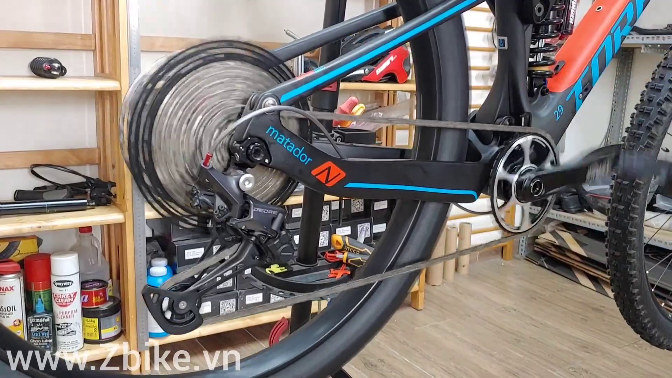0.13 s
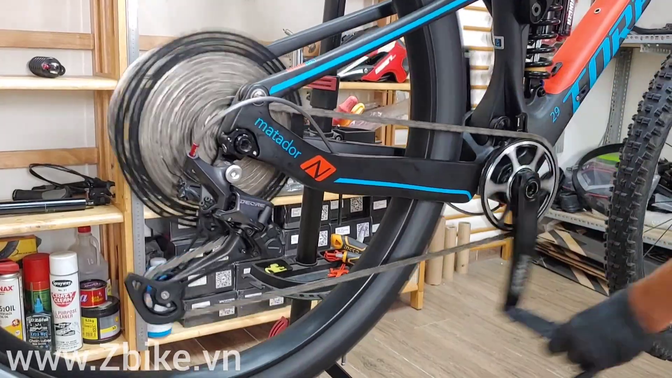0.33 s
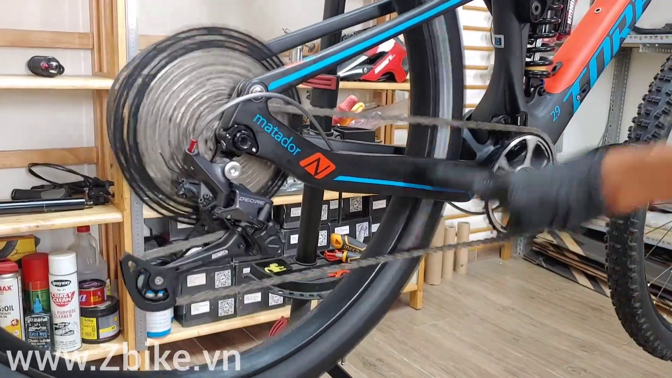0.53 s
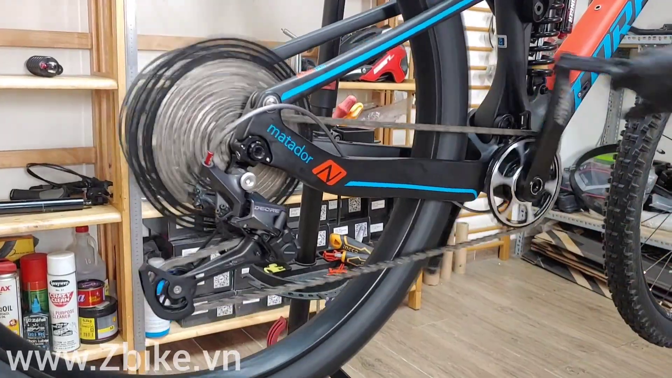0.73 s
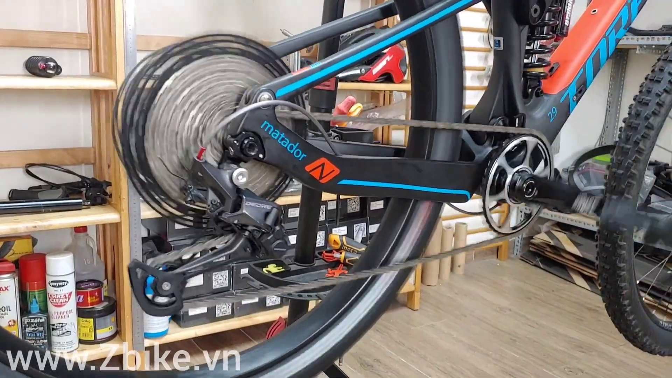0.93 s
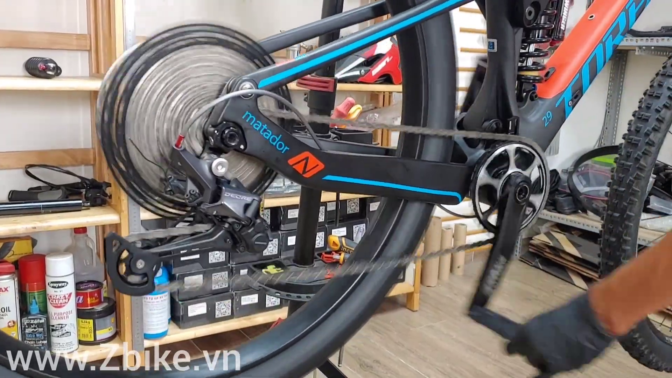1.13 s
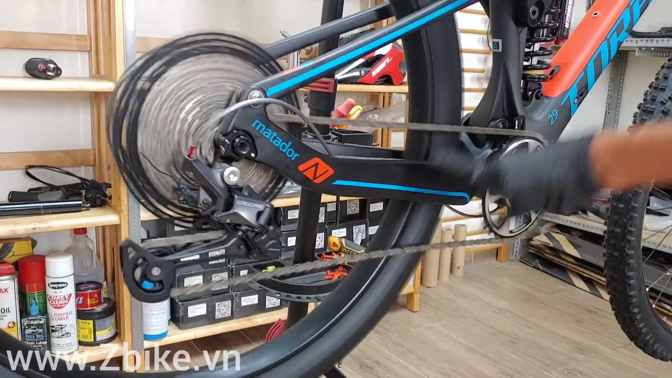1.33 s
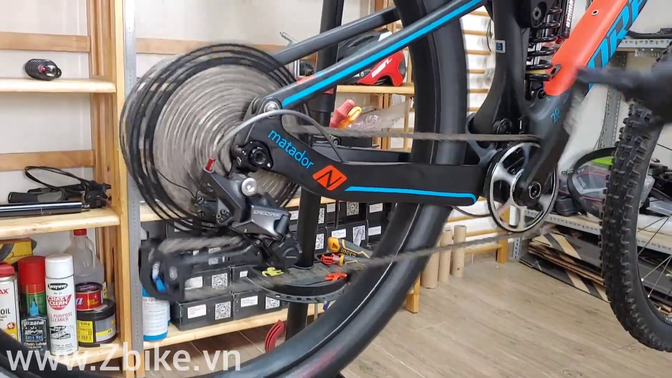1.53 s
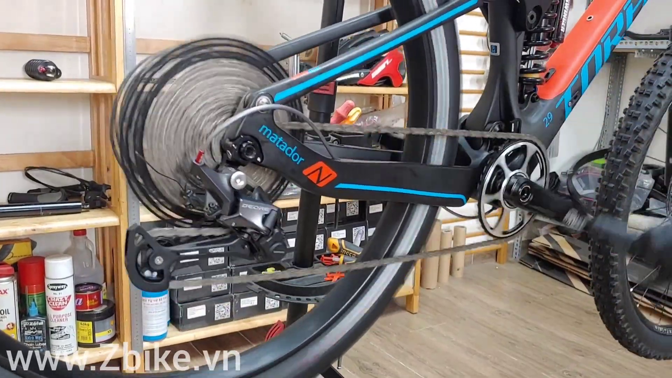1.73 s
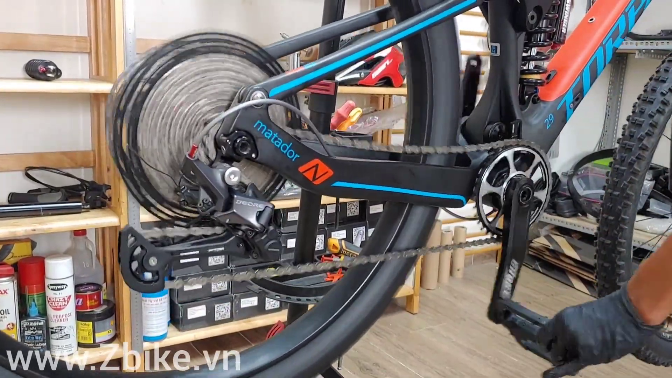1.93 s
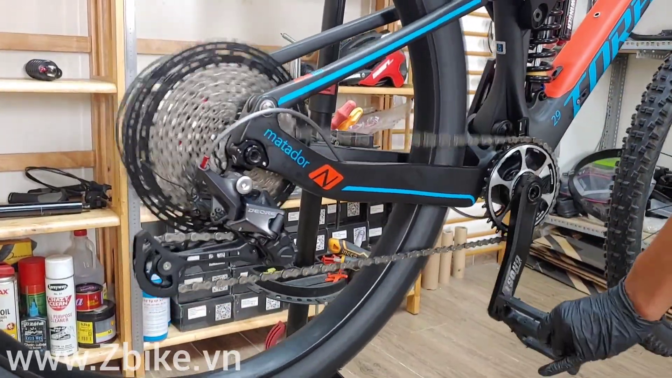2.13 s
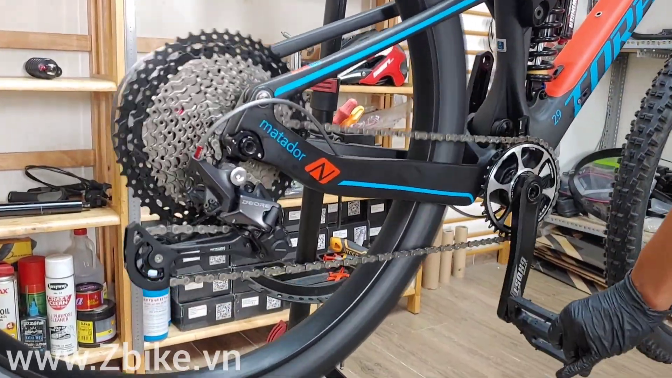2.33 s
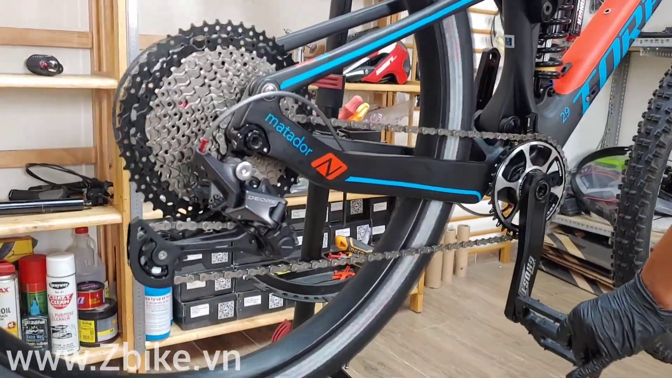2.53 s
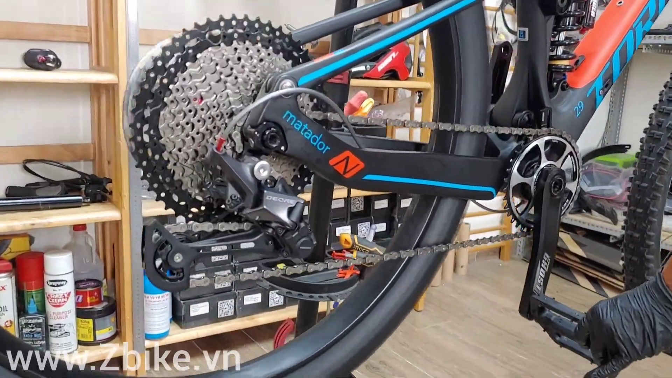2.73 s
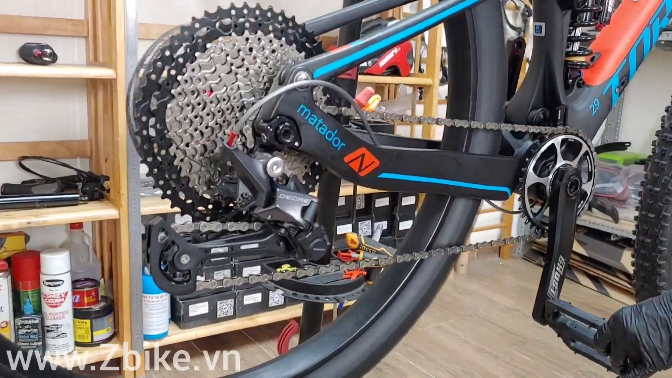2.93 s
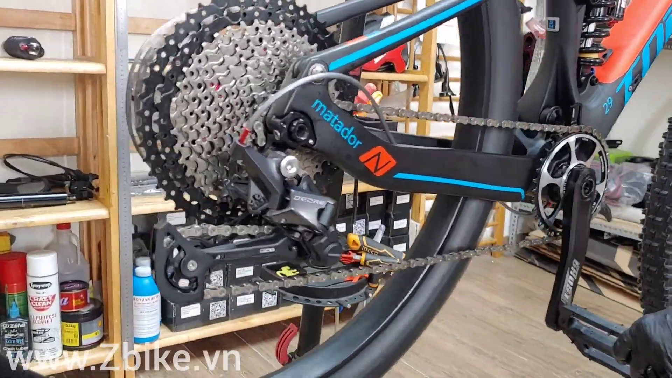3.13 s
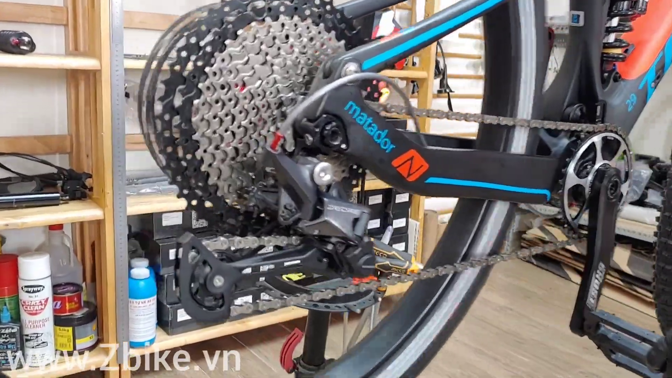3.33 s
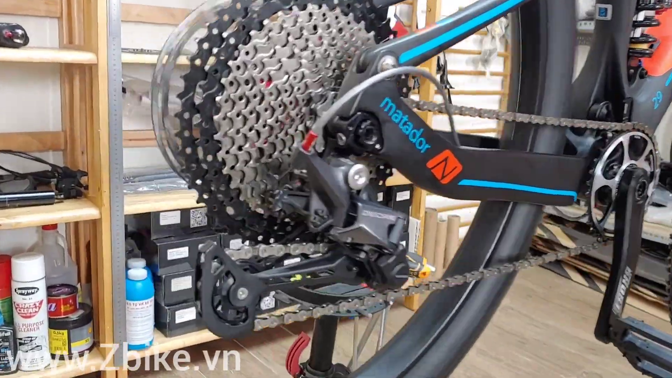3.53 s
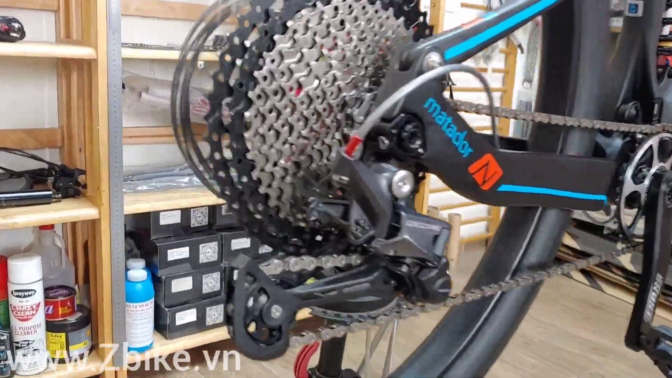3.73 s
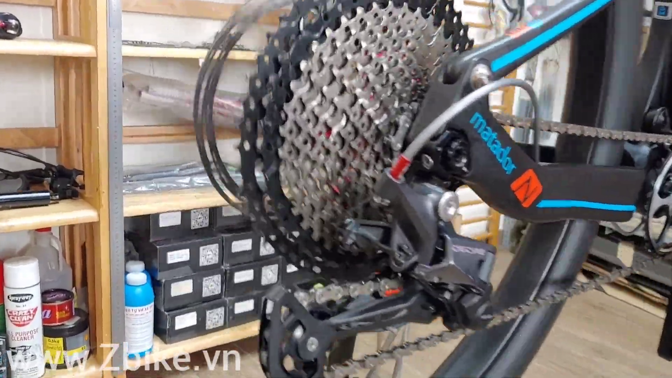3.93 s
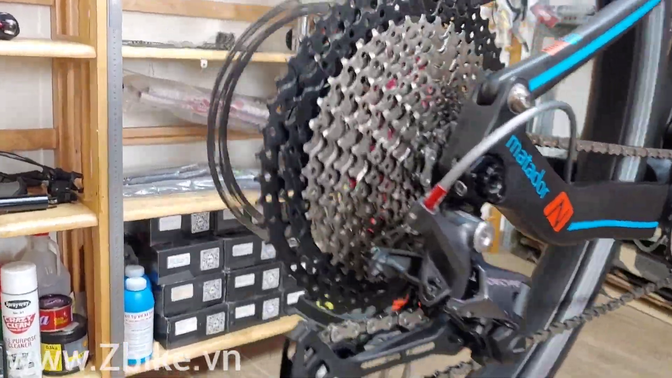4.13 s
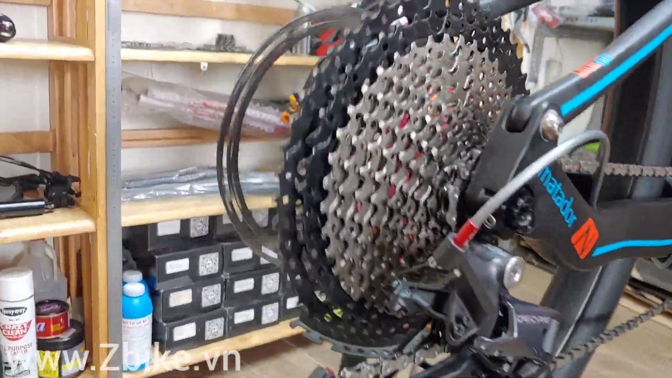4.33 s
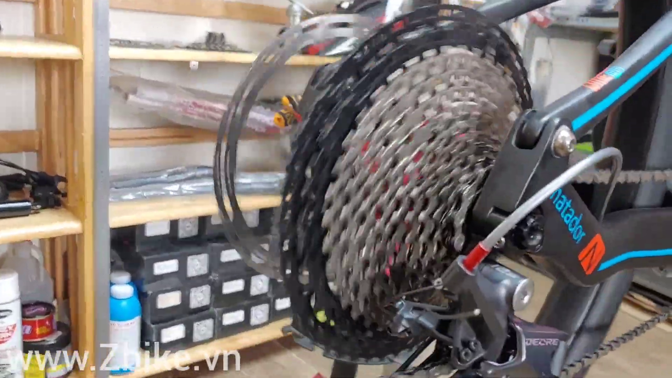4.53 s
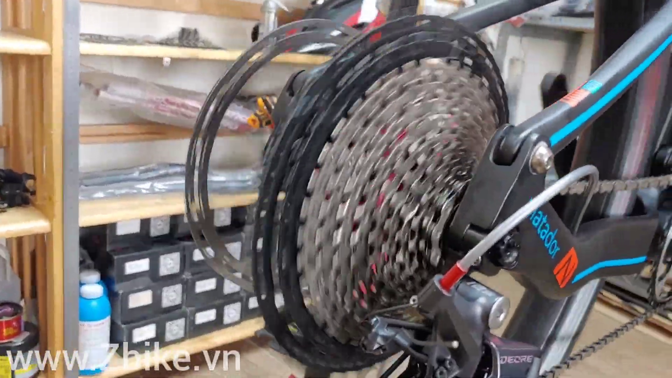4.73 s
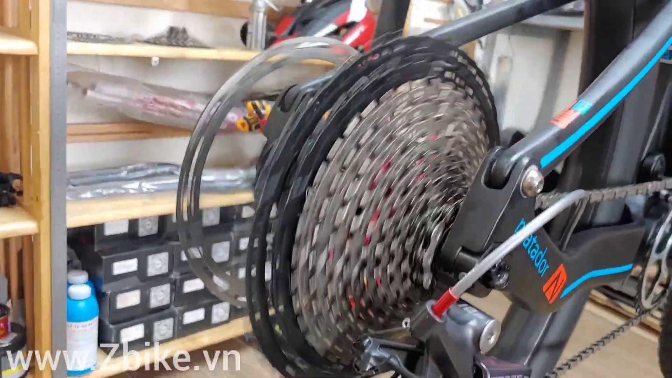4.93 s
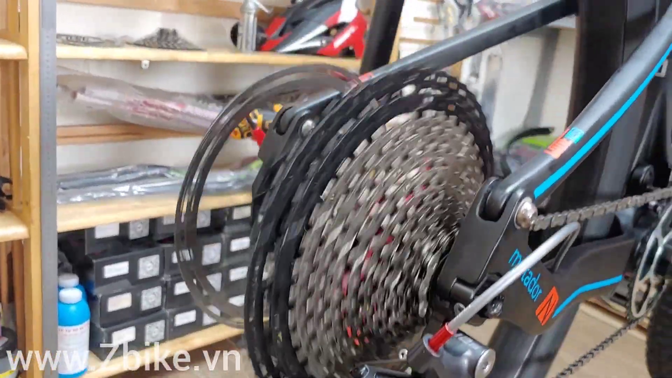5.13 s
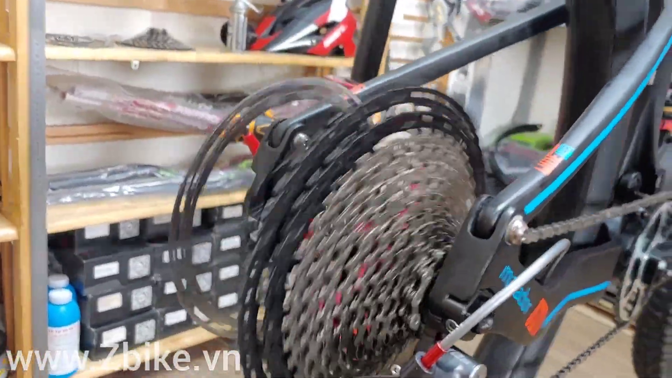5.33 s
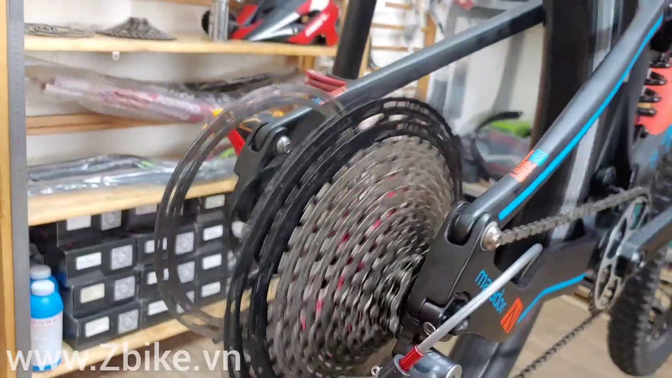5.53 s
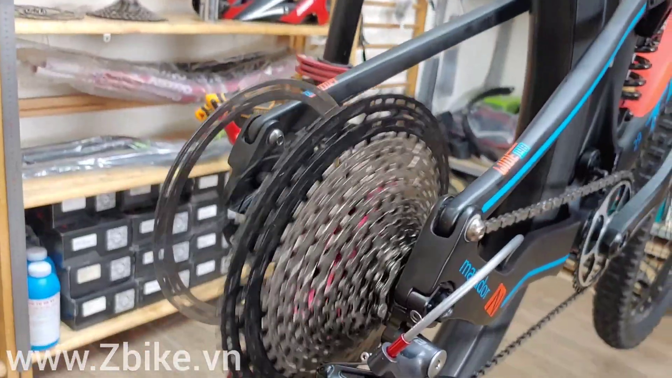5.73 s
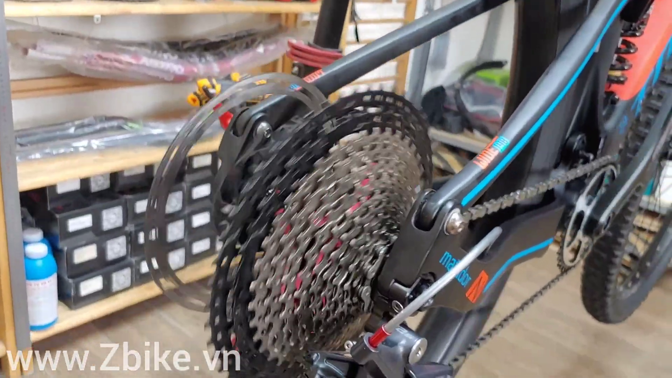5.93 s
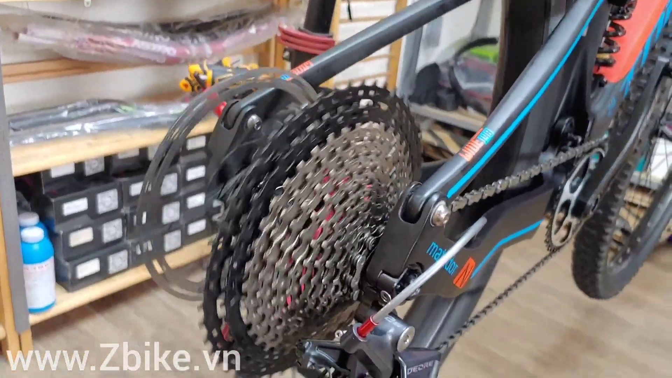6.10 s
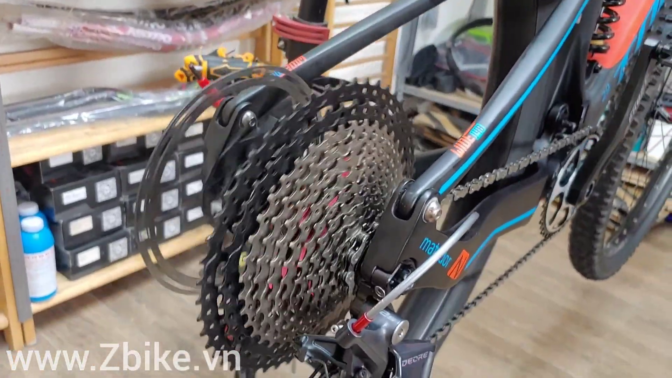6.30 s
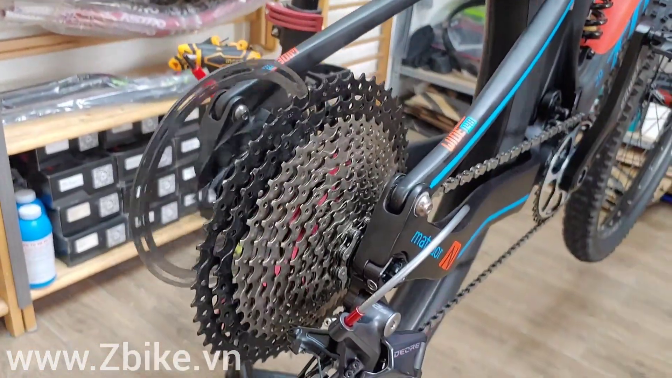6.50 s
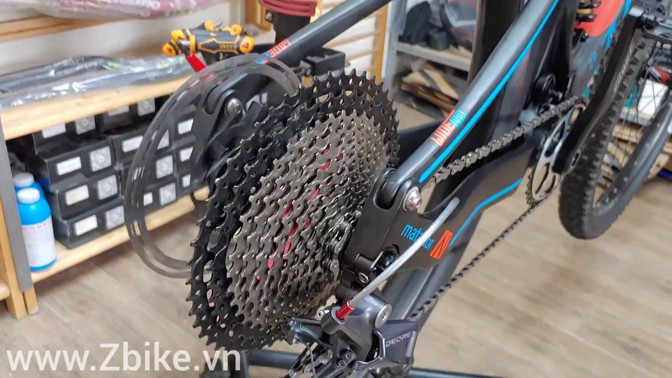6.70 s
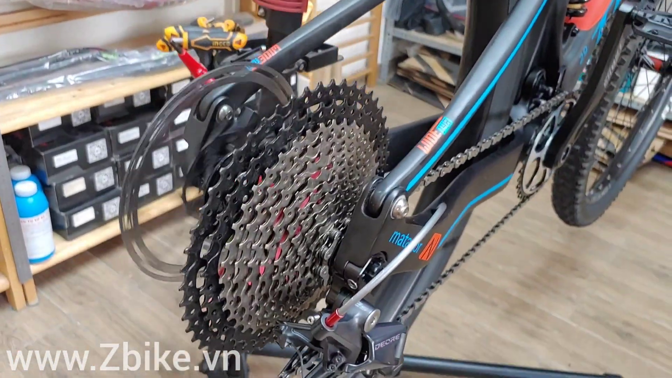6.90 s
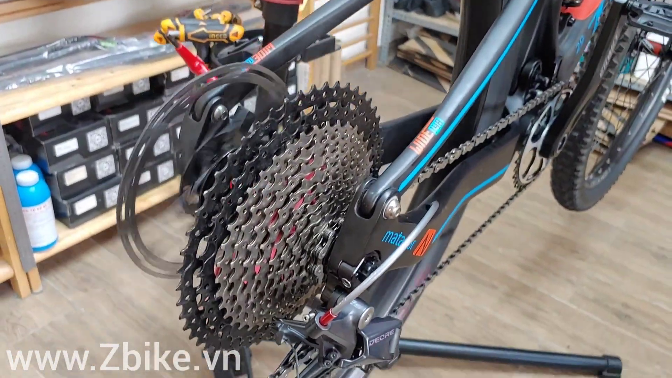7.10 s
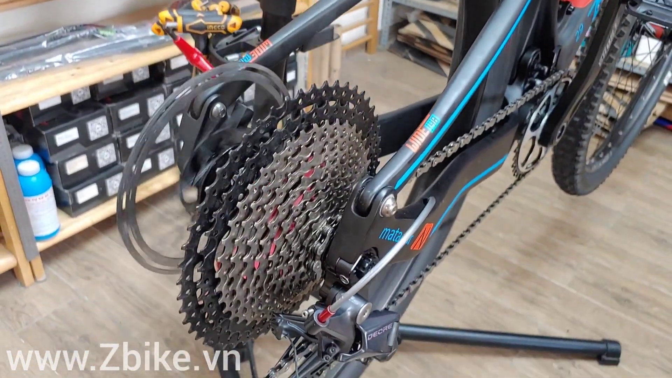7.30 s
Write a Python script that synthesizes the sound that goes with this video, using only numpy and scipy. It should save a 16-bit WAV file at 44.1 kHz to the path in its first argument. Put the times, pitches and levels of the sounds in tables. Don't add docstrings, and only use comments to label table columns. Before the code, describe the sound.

Two seconds of rattling chain shifts and metallic knocks, then a fast, piercing ratchet buzz rising in pitch and sinking again in a small shop.

```python
import sys
import numpy as np
from scipy import signal
from scipy.fft import rfft, irfft, next_fast_len
from scipy.io import wavfile
from scipy.ndimage import uniform_filter1d, minimum_filter1d

SR = 44100
rng = np.random.default_rng(int(sys.argv[2]) if len(sys.argv) > 2 else 0)


def file_out(sig):
    cols = np.atleast_2d(sig).T
    lim = np.clip(cols, -1, 1)
    pcm = np.round(lim * 32767).astype(np.int16)
    wavfile.write(sys.argv[1], SR, pcm)


def makeup_ratio(level_db):
    decades = np.asarray(level_db, float) / 20
    return 10 ** decades


N = 328978
T_S = np.arange(N) / SR
SIZE = next_fast_len(N + SR)
HZ = np.maximum(np.arange(SIZE // 2 + 1) * SR / SIZE, 1)
RELEASE_S, SETTLED_S = 1.959, 4.86

# (frequency [Hz], width [Hz], gain [dB])
SNAP_PEAKS = [(7620, 260, 6), (8290, 130, 7), (8760, 120, 3), (9160, 50, 4), (9750, 150, 3),
              (12200, 150, 5), (13750, 110, 6)]


def rms_one(x):
    return x / np.sqrt(np.mean(x ** 2) + 1e-20)


def in_time(rows):
    s, *columns = np.transpose(rows)
    return [np.interp(T_S, s, c) for c in columns]


def at_hz(points, hz):
    table_hz, value = np.array(points).T
    return np.interp(np.log(hz), np.log(table_hz), value)


def colour(x, spectrum, peaks=()):
    db = at_hz(spectrum, HZ)
    for hz, width_hz, gain_db in peaks:
        db = db + gain_db / (1 + (2 * (HZ - hz) / width_hz) ** 2)
    cepstrum = irfft(np.log(rms_one(makeup_ratio(db))), SIZE)
    cepstrum[1:SIZE // 2] *= 2
    cepstrum[SIZE // 2 + 1:] = 0
    return irfft(rfft(x, SIZE) * np.exp(rfft(cepstrum)), SIZE)[..., :N]


def butter(x, order, hz, kind="low"):
    return signal.sosfilt(signal.butter(order, hz, kind, fs=SR, output="sos"), x)


def drift(rate_hz):
    r = np.exp(-2 * np.pi * rate_hz / SR)
    return rms_one(signal.lfilter([1], [1, -2 * r, r * r], rng.standard_normal(N + SR))[SR:])


def fade(x, t60_s):
    return signal.lfilter([1], [1, -makeup_ratio(-60 / (t60_s * SR))], x + 1e-18)


def grains(per_s, spread_db):
    sizes = makeup_ratio(spread_db * np.minimum(rng.exponential(1, N), 5)) * rng.choice([-1, 1], N)
    return rms_one(sizes * (rng.random(N) < per_s / SR))


def pair(shape):
    # (frequency [Hz], likeness [0..1])
    likeness = [(60, 0.63), (300, 0.86), (700, 0.48), (1500, 0.1), (16000, 0.073)]
    mid, side = rfft(shape, SIZE)
    alike = np.clip(at_hz(likeness, HZ), 0, 1)
    return np.sqrt(1 + alike) * mid + np.sqrt(1 - alike) * side * [[1], [-1]]


def room(x, gap_s=0.0018):
    # (frequency [Hz], t60 [s])
    room_t60 = [(100, .7), (1000, 0.37), (4000, 0.41), (9000, 0.19), (16000, 0.18)]
    t, tail = np.arange(SR) / SR, 0
    white = rng.standard_normal((2, SR)) * (t > gap_s)
    edges_hz = [20, 200, 500, 1200, 3000, 6000, 11000, 21000]
    for low, high in zip(edges_hz, edges_hz[1:]):
        t60_s = at_hz(room_t60, np.sqrt(low * high))
        band = butter(white, 2, [low, high], "band")
        tail = tail + band * makeup_ratio(-60 * t / t60_s) * np.sqrt(np.log(1000) / (t60_s * SR))
    return irfft(rfft(x, SIZE) * pair(tail), SIZE)[:, :N]


def swing():
    return np.clip((T_S - 5.9) / 0.14, 0, 1)


def shop():
    # (frequency [Hz], density [dB per Hz])
    air_spectrum = [(18, -42), (30, -20.5), (55, -14), (100, -4), (170, -15), (400, -13.5), (900, -17.5),
                    (2000, -22), (5000, -17.5), (8000, -13), (16000, -26)]
    hum_hz, hum_db, air_db = 74.4, -44, -41.5
    duck_db, duck_s, sink_db_per_s, swing_db = -7.5, 0.1005, -2.5, 4
    since = np.maximum(T_S - RELEASE_S, 0)
    gain_db = duck_db * (1 - np.exp(-since / duck_s)) + swing_db * swing()
    sunk_db = sink_db_per_s * np.minimum(since, SETTLED_S - RELEASE_S)
    hum = np.sqrt(2) * np.sin(2 * np.pi * np.cumsum(hum_hz * (1 + 0.0026 * drift(3.3))) / SR)
    hum = makeup_ratio(hum_db + sunk_db + 2.0 * drift(3)) * hum * makeup_ratio([[2.2], [-2.2]])
    air = rms_one(colour(irfft(pair(rng.standard_normal((2, SIZE))), SIZE), air_spectrum))
    air = makeup_ratio(air_db + 0.53 * sunk_db + 0.5 * drift(0.34)) * air
    return makeup_ratio(gain_db) * (hum + air)


def frame(thud):
    # (frequency [Hz], level [dB], t60 [s])
    modes = [(135, -16, .4), (355, -3, .65), (385, -7, .5), (409, -2, .65), (455, -5, .75), (522, -4, .9),
             (590, -11, .5), (700, -3, .5), (818, -8, .55), (1114, -8, .28), (1733, -14, .4),
             (2450, -10, .27)]
    rings = np.zeros(N)
    for hz, level_db, t60_s in modes:
        r, w = makeup_ratio(-60 / (t60_s * SR)), 2 * np.pi * hz / SR
        mode = signal.lfilter([0, np.sin(w)], [1, -2 * r * np.cos(w), r * r], thud + 1e-18)
        rings += makeup_ratio(level_db - 45.5) * mode
    return rings


def spoke_ring():
    # (time [s], frequency [Hz], level [dB], t60 [s])
    ring = (1.64, 409, -31, 1.6)
    s, hz, level_db, t60_s = ring
    t = np.maximum(T_S - s, 0)
    waver_db, sway_rad = 3 * drift(8), .9 * drift(8)
    return makeup_ratio(level_db - 60 * t / t60_s + waver_db) * np.sin(2 * np.pi * hz * t + sway_rad) * (t > 0)


def chain(tick_t60_s=.014):
    # (time [s], peak [dB], gear body over peak [dB], rattle t60 [s])
    landings = [(0.0607, -7.5, -8.5, 0.2), (0.1704, -13.5, -4.5, 0.075), (0.182, -16.5, -8.5, 0.29),
                (0.4557, -9.5, -19, 0.26), (0.4768, -17.5, 2.5, 0.23), (0.5087, -29.5, 4, 0.27),
                (0.644, -9.5, -6.5, 0.21), (0.79, -17.5, -2.5, 0.2), (0.8704, -5.5, -21, 0.079),
                (0.8735, -5, -23, 0.1), (0.891, -17.5, -10, 0.2), (1.0894, -19, -9, 0.18),
                (1.1144, -10.5, -21, 0.11), (1.12, -7.5, -17, 0.18), (1.156, -11.5, -15.5, 0.39),
                (1.2562, -14.5, -5.5, 0.32), (1.4277, -21, -0.5, 0.14), (1.5288, -3.5, -16, 0.081),
                (1.5377, -17, -7, 0.093), (1.618, -14, -25, 0.074), (1.6337, -4.5, 3.5, 0.056),
                (1.6514, -6, -9, 0.14), (1.668, -8.5, 3, 0.055), (1.6982, -21, -0.5, 0.35),
                (1.7894, -27.5, -9, 0.46), (2.053, -24, 4, 0.052)]
    # (time [s], peak [dB])
    roller_ticks = [(0.049, -27), (0.2134, -10.5), (0.232, -9), (0.2667, -14), (0.2853, -19), (0.3465, -18),
                    (0.3875, -16.5), (0.4386, -10.5), (0.832, -4), (0.945, -9), (1.0216, -15.5),
                    (1.045, -26), (1.1894, -20), (1.3204, -30), (1.4497, -8), (1.487, -12.5), (1.506, -29),
                    (1.939, -18)]
    # (time [s], level [dB], t60 [s])
    bumps = [(0.4582, -17.5, 0.22), (0.4764, -6.5, 0.21), (0.5093, -10.5, 0.19), (0.61, -4, 0.073),
             (0.792, -25, 0.22), (0.873, -29, 0.4), (1.118, -30, 0.42), (1.537, -23, 0.27),
             (1.6173, -20.5, 0.24), (1.6329, 1, 0.097), (1.65, -34.5, 0.42), (1.698, -2.5, 0.22),
             (1.7879, -12.5, 0.21), (2.799, -39, .15), (2.958, -34, .015), (3.593, -33, .015),
             (4.27, -60, .04), (6.2, -45, .04)]
    # (time [s], pull [dB])
    pull = [
        (0, -2.5),
        (.4, -6),
        (.7, 4),
        (1.05, -0.5),
        (1.35, -0.5),
        (1.55, 5),
        (1.75, 6),
        (1.85, -17),
        (1.95, 2),
        (2.05, -34),
    ]
    # (frequency [Hz], density [dB per Hz])
    link_spectrum = [(2350, -32), (4000, -10.5), (5110, -11.5), (5980, -10), (6880, 0), (8010, 1),
                     (9210, -9), (14900, -28), (16100, -42)]
    # (frequency [Hz], density [dB per Hz])
    body_spectrum = [(470, -48), (800, -7), (925, -16.5), (1080, 3.5), (1310, 4), (1600, -1.5),
                     (1960, -0.5), (2690, 1.5), (5000, -13.5), (6500, -42), (11000, -120)]
    # (frequency [Hz], width [Hz], gain [dB])
    body_peaks = [(1330, 70, 7), (1750, 60, 5), (2050, 80, 4), (2560, 90, 5)]
    # (frequency [Hz], density [dB per Hz])
    thud_spectrum = [(53, -57), (90, -15.5), (306, -14), (353, -1), (415, -2), (462, -8), (706, -1.5),
                     (925, -7.5), (1200, -24), (1560, -84), (2640, -120)]
    links_db, gears_db, gears_follow = -25.5, -40, 2.5
    scatter_db, frame_share_db = 5.0, -32.5
    rise_share = 0.013

    pull_db, = in_time(pull)
    links = makeup_ratio(links_db + pull_db - 8.5) * np.array([grains(2500, 2.9), grains(2500, 7.2)])
    body = makeup_ratio(gears_db + gears_follow * pull_db - 12) * grains(2200, 3.7)
    thud = np.zeros(N)

    jingle, rattle = np.array([grains(9000, 0.57), grains(6700, 4.2)]), grains(5000, 0.97)
    shake, t = rng.standard_normal(N), np.arange(SR // 2) / SR
    for s, level_db, t60_s in bumps:
        span = slice(round(s * SR), round(s * SR) + SR // 2)
        thud[span] += makeup_ratio(level_db - 8 - 60 * t / t60_s) * shake[span]
    ticks = [(s, peak_db, -20, tick_t60_s) for s, peak_db in roller_ticks]
    pans_db = scatter_db * rng.standard_normal(60)
    for (s, peak_db, over_db, t60_s), pan_db in zip([*landings, *ticks], pans_db):
        at = round(s * SR)
        span = slice(at, at + SR // 2)
        sides = makeup_ratio([pan_db / 2, -pan_db / 2])
        burst = makeup_ratio(peak_db - 6.5 - 60 * t / t60_s) * np.minimum(t / (t60_s * rise_share), 1)
        links[:, span] += burst * jingle[:, span] * sides[:, None]
        links[:, at] += makeup_ratio(peak_db + 5) * sides
        body[span] += burst * rattle[span] * makeup_ratio(over_db)
        thud[span] += burst * shake[span] * makeup_ratio(frame_share_db)

    links = colour(links, link_spectrum, SNAP_PEAKS[:3])
    low = colour(body, body_spectrum, body_peaks) + makeup_ratio(-7.5) * colour(thud, thud_spectrum)
    low = low + frame(thud) + spoke_ring()
    links = links + room(links[0])
    gain_db, = in_time([(0, -1.55), (1.96, -0.82), (2.1, 0.023)])
    return makeup_ratio(gain_db) * (links + low * makeup_ratio([[2.5], [-2.5]]) + makeup_ratio(8.5) * room(low))


def skids():
    # (time [s], level [dB], t60 [s])
    scrapes = [
        (.172, -28, 0.46),
        (.79, -28, 0.25),
        (.874, -17, 0.23),
        (1.119, -12, .4),
        (1.53, -35, 0.078),
    ]
    level = 0
    for s, level_db, t60_s in scrapes:
        level = level + makeup_ratio(level_db - 60 * np.maximum(T_S - s, 0) / t60_s) * (T_S > s)
    grit = np.array([grains(7000, 3.0), grains(7000, 3.0)])
    return level * butter(grit, 3, [9000, 15000], "band")


def stand():
    # (time [s], level [dB], t60 [s])
    rocks = [
        (0.469, -28.5, 0.74),
        (.88, -43, 0.52),
        (1.12, -42, 0.74),
        (1.22, -44, 0.75),
        (6.45, -55, .6),
    ]
    level = 0
    for s, level_db, t60_s in rocks:
        rise = np.clip((T_S - s) / 0.017, 0, 1)
        level = level + makeup_ratio(level_db - 60 * np.maximum(T_S - s, 0) / t60_s) * rise
    low = butter(rng.standard_normal(N), 2, [95, 220], "band")
    return level * rms_one(low) * makeup_ratio([[2.5], [-2.5]])


def shell_buzz(teeth, rasp_db, glide, count=34, odd_db=-4):
    # (frequency [Hz], density [dB per Hz])
    shell_spectrum = [(400, -47), (800, -43), (1300, -30), (1900, -17.5), (2300, -4), (2550, 0), (2850, -3),
                      (3200, -9), (3750, 0.5), (4300, -6.5), (4700, -1), (5500, -6), (6300, -22),
                      (7500, -15)]
    # (frequency [Hz], width [Hz], gain [dB])
    rasp_peak = (2580, 260, 20)
    blur_db, chatter_db = 1.1, -17
    hop = 64
    coarse, out = np.arange(0, N + hop, hop), np.zeros((2, N))
    coarse_glide = glide[np.minimum(coarse, N - 1)]
    noise = rng.standard_normal((2, count, 2, len(coarse) + 200))
    step = np.exp(2j * np.pi * teeth)
    turn = step ** 2
    for k in range(3, count):
        turn = turn * step
        flicker_hz = 22 + .95 * k
        r = np.exp(-2 * np.pi * flicker_hz * hop / SR)
        paths = rms_one(signal.lfilter([1], np.poly([r, r, r, r]), noise[:, k])[..., 200:])
        swell = uniform_filter1d(noise[1, k - 2, :, 200:], size=70, mode="wrap")
        swell = rms_one(uniform_filter1d(swell, size=70, mode="wrap"))
        paths = paths * makeup_ratio(2.6 * swell - blur_db * k / 10 * coarse_glide)
        overtone = makeup_ratio(odd_db * (k % 2))
        for side, path in enumerate(paths[0] + 1j * paths[1]):
            out[side] += overtone * (np.interp(np.arange(N), coarse, path) * turn).real
    rasp = makeup_ratio(rasp_db) * colour(rng.standard_normal((2, N)), shell_spectrum, [rasp_peak])
    chatter = rms_one(colour(rng.standard_normal((2, N)), shell_spectrum))
    rasp = rasp + makeup_ratio(chatter_db) * (glide + 1.8) * chatter
    tones = rms_one(colour(out, shell_spectrum)) * np.clip(teeth / 3.3, 0, 1)
    return (tones + rasp) * (teeth > 0)


def freehub(uneven_db=0.5, snap_t60_s=0.099, bounce_db=-9):
    # (time [s], rate [teeth per s])
    coast = [(2.5, 212.2), (2.8, 213.8), (3.6, 209.7), (3.99, 224.9), (4.28, 210.4), (4.45, 221.0),
             (4.5, 237.9), (4.6, 247.4), (4.93, 258.4), (5.26, 245.1), (5.59, 251.5), (5.9, 239.9),
             (5.97, 229.9), (6.09, 222.7), (6.3, 224.4), (6.48, 191.5), (7.46, 185.5)]
    # (time [s], level over the steady snap [dB], length [s])
    drops = [(1.9588, 9, .0035), (1.9732, 8, .0042), (1.9838, 8, .002), (1.9905, 10, .0035),
             (1.998, 11, .001), (2.005, 4, .002), (2.012, 6, .001), (2.015, 7, .0015), (2.025, 7, .002),
             (2.029, 9, .001), (2.032, 7, .003)]
    # (frequency [Hz], density [dB per Hz])
    snap_spectrum = [(3530, -37), (6000, -13), (6930, -11), (7440, -4), (8110, -7), (8530, -4.5),
                     (8780, -8.5), (10400, -17.5), (13100, -23.5), (14200, -23), (15300, -26.5),
                     (16100, -9.5)]
    release_share, catch_up_s = .26, .05

    since = T_S - RELEASE_S
    speed, = in_time(coast)
    lag = (1 - release_share) * np.exp(-np.maximum(since, 0) / catch_up_s)
    speed = speed * (1 - lag) * (since > 0)
    unevenly_cut = .002 * drift(15)
    teeth = np.cumsum(speed * (1 + unevenly_cut)) / SR
    glide = uniform_filter1d(np.abs(np.gradient(speed)) * SR / 100, size=2000)

    approach_s = 1.74
    close, swung = np.clip((T_S - approach_s) / (SETTLED_S - approach_s), 0, 1), swing()
    snap_db = -4 - 0.3347 * since + .4 * drift(1.3)
    shell_db = -24 + 3 * close + 0.5 * swung + .6 * drift(6)
    fullness_db = 2 + 7 * close + 0.5 * swung
    rasp_db = -5.5 + 2.5 * drift(12) + 2 * np.minimum(glide, 3)

    snap, chance = np.zeros(N), rng.standard_normal((2, 2000))
    tooth = np.arange(int(teeth[-1]) - 1) + 0.011
    engaged = np.clip(tooth / 12, 0, 1)
    for pawl in range(2):
        at = np.interp(tooth + pawl / 2, teeth, np.arange(N)).astype(int)
        snap[at] += engaged * makeup_ratio(-2.5 * pawl + uneven_db * engaged * chance[pawl, :len(tooth)])
    bounces = makeup_ratio(bounce_db + 2.0 * drift(150)) * np.clip(teeth / 14, 0, 1)
    contact = fade(snap, snap_t60_s) + bounces
    steady = np.sqrt(np.mean(contact[N // 2:] ** 2))
    for s, level_db, length_s in drops:
        contact[round(s * SR):round((s + length_s) * SR)] += steady * makeup_ratio(level_db + 1.5)
    linger_s = 0.05
    lingering = fade(contact ** 2, linger_s) * np.log(1000) / (linger_s * SR)
    contact = np.sqrt(contact ** 2 + makeup_ratio(2.0) * lingering)
    snap = colour(contact * rng.standard_normal((2, N)), snap_spectrum, SNAP_PEAKS)
    snap = butter(snap, 8, 6200, "high")

    shell = shell_buzz(teeth, rasp_db, np.minimum(glide, 7)) * makeup_ratio([[1], [-1]])
    shell = shell + (makeup_ratio(fullness_db) - 1) * butter(shell, 2, 1800)
    body = signal.sosfiltfilt(signal.butter(3, 3200, fs=SR, output="sos"), shell)
    shell = shell + (makeup_ratio(6 * swung) - 1) * body
    coasting = slice(round(2.3 * SR), N)
    snap = makeup_ratio(snap_db) * snap / snap[:, coasting].std()
    return snap + makeup_ratio(shell_db) * shell / shell[:, coasting].std()


def scene():
    return shop() + chain() + skids() + stand() + freehub()


def band_limit(x):
    return signal.sosfilt(signal.butter(12, 16270, fs=SR, output="sos"), x)


def record(dry):
    cutoff_hz, ceiling = 15720, 1.0
    cut = signal.sosfilt(signal.ellip(10, .5, 55, cutoff_hz, fs=SR, output="sos"), dry)
    allowed = np.minimum(1, ceiling / (np.abs(cut).max(0) + 1e-9))
    allowed = minimum_filter1d(allowed, size=257)
    return band_limit(cut * uniform_filter1d(allowed, size=129))


dry = scene()
out = record(dry)
file_out(out)
```